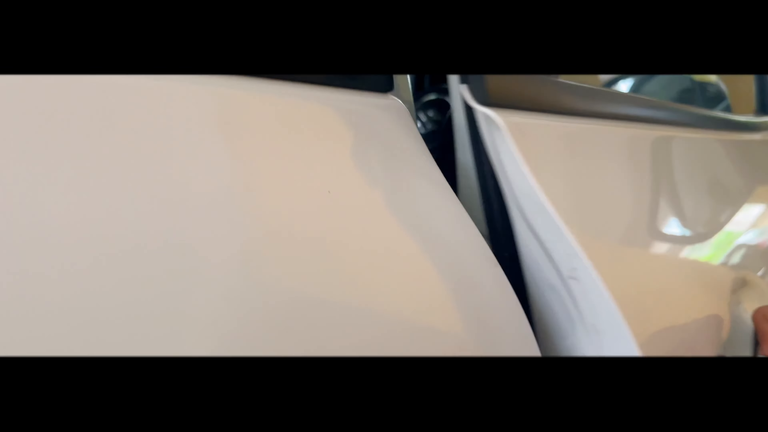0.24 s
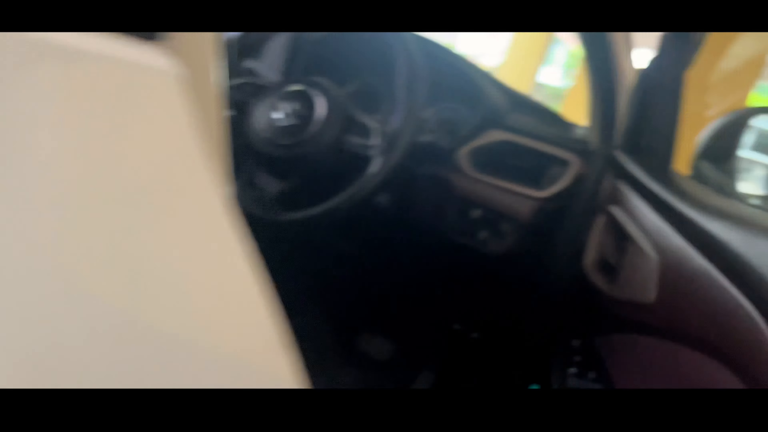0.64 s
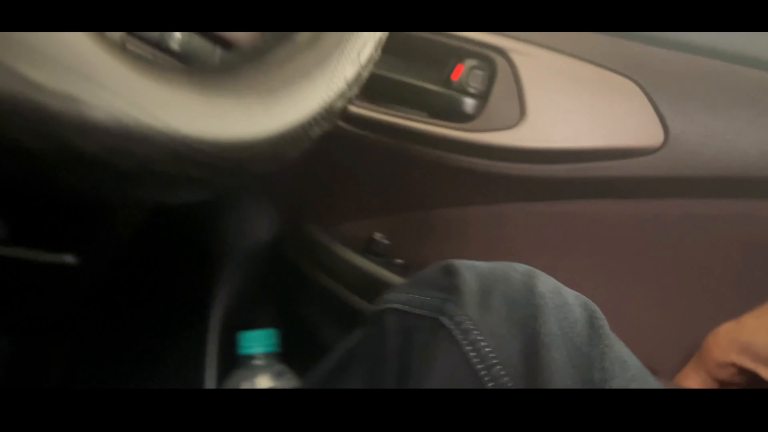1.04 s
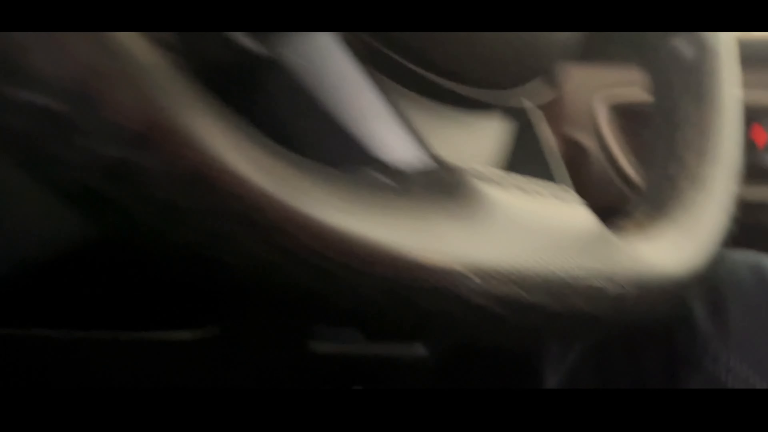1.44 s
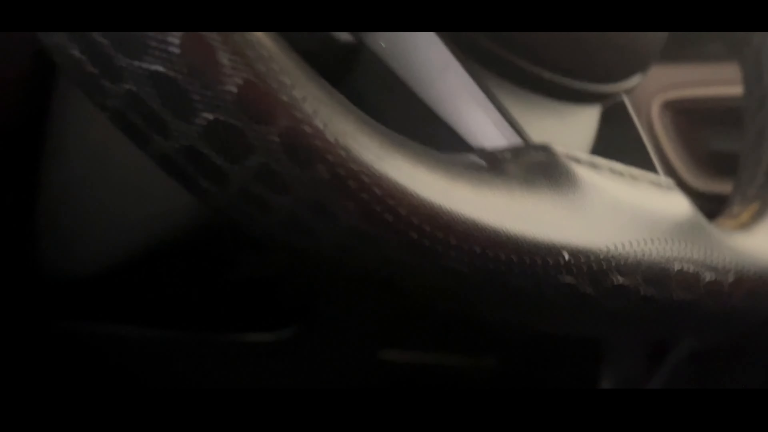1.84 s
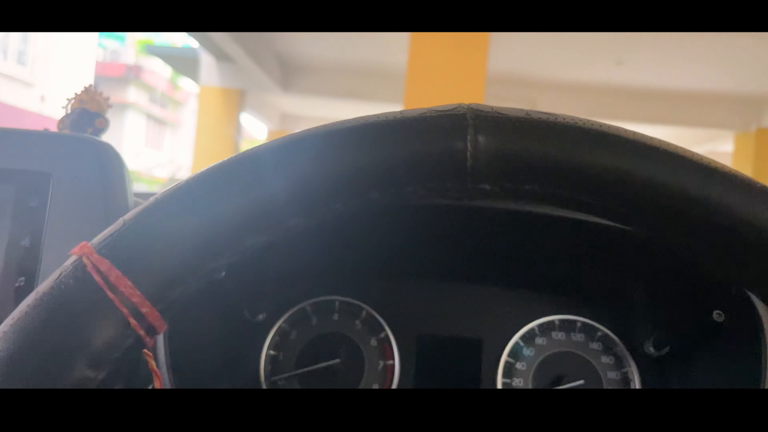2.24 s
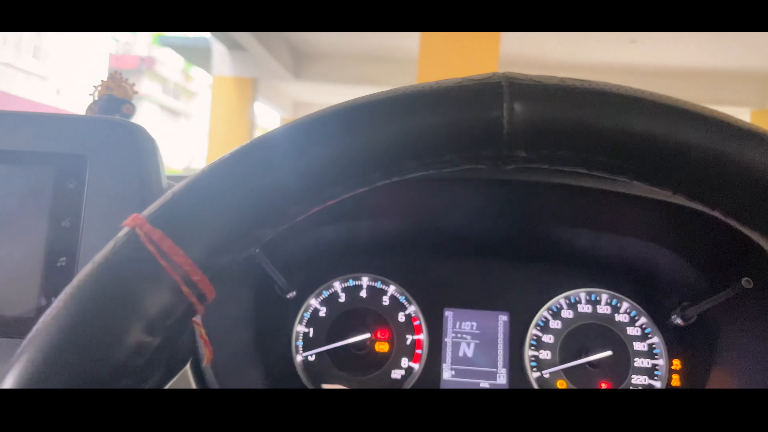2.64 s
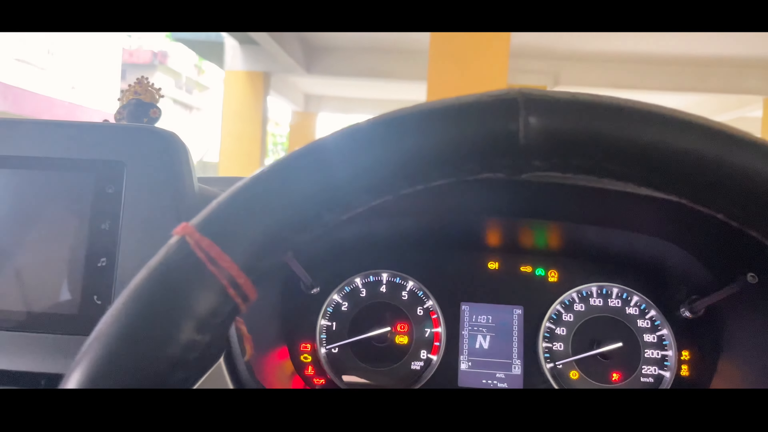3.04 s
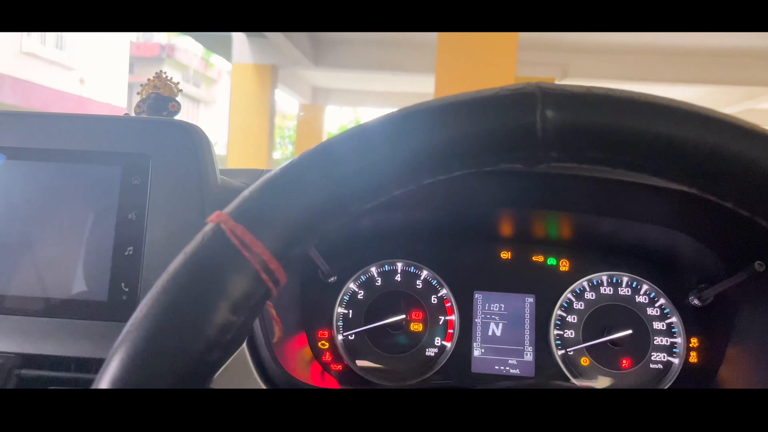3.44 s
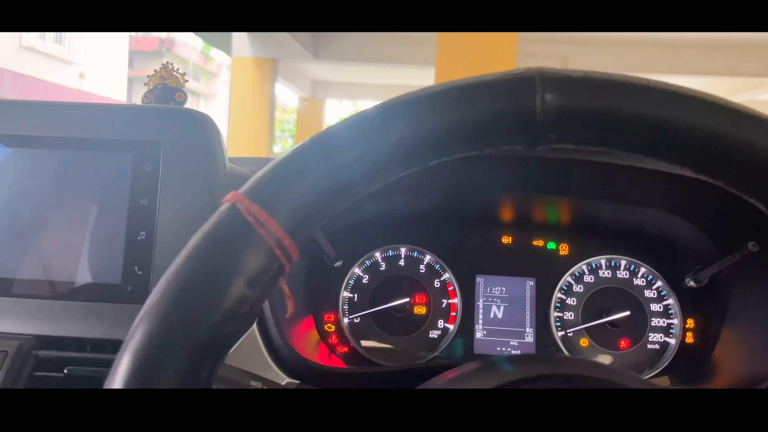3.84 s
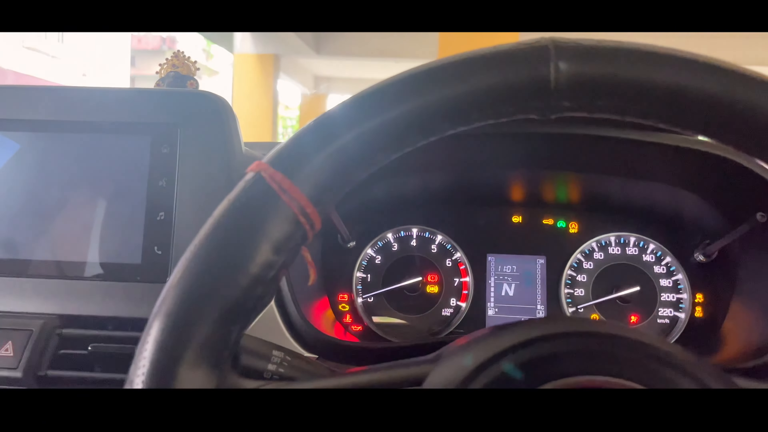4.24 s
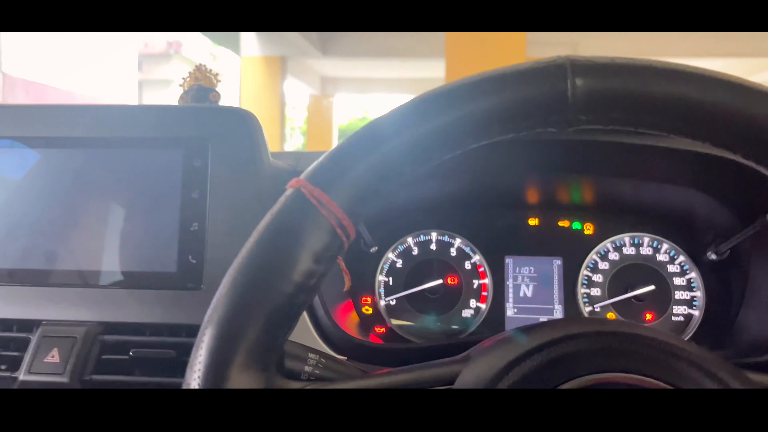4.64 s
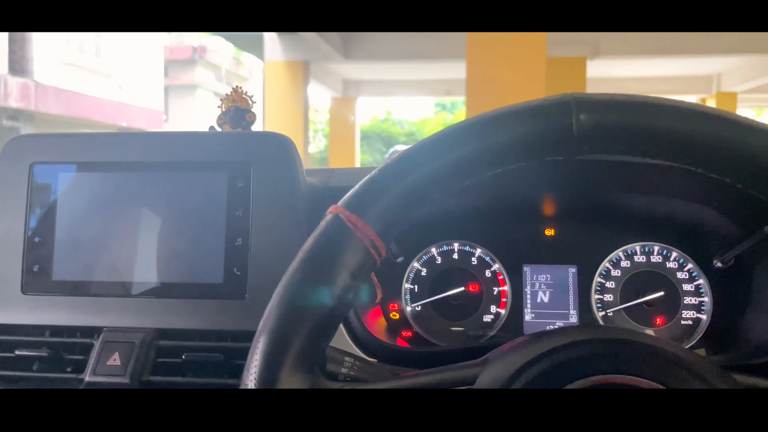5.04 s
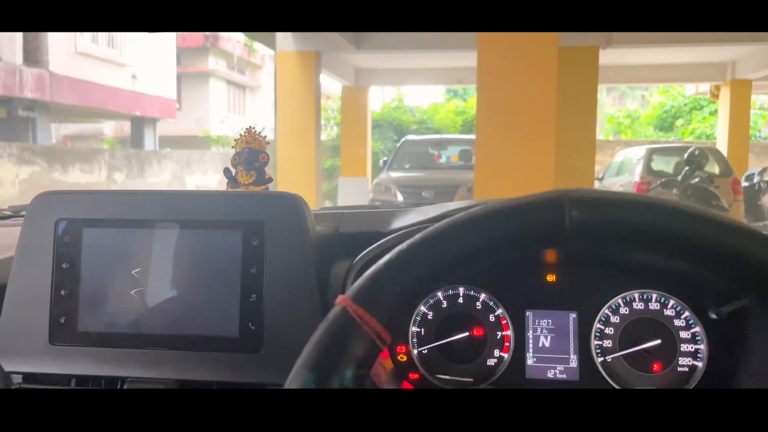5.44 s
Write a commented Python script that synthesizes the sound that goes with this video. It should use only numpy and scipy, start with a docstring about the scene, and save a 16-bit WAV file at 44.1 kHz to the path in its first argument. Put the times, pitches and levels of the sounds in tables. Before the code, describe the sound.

Close stereo microphone moving from a garage into a car: padded door-opening knocks, airy hiss and rumble, a few cabin ticks, an abrupt little noise burst and soft bumps. The door slams with a heavy bass boom, and the space becomes muffled and quiet. A plasticky switch click rings briefly; afterwards only tiny squeaks, trim ticks, clothing rustle, a faint drone and a barely audible distant horn.

```python
"""Car door, from inside the cabin

A door opens, someone climbs in and pulls it shut: noise bursts ring the panel and crack at the latch,
two low tones make the beating boom of cabin air, and a ten-millisecond burst of noise swells and stops dead.
A dashboard switch rattles and rings, trim resonances tick, grainy noise is cloth on the seat, a motor drones.
Behind: a hum, open-air hiss, street rumble, garage murmur and the two tones of a far horn.
Every source is a pair of rows: mid and side, or direct and scattered at the microphone ports."""
import sys
import numpy as np
from scipy import signal
from scipy.fft import rfft, irfft
from scipy.io import wavfile
from scipy.ndimage import uniform_filter1d

SR = 44100
rng = np.random.default_rng(int(sys.argv[2]) if len(sys.argv) > 2 else 0)


def store_pcm(level_fs):
    """Save levels as 16-bit WAV."""
    pcm = np.round(np.clip(level_fs, -1, 1) * 32767).astype(np.int16)
    wavfile.write(sys.argv[1], SR, np.atleast_2d(pcm).T)


def invert_db(level):
    """Linear amplitude ratio for a level in decibels (20 dB per decade), elementwise."""
    return 10 ** (np.asarray(level, dtype=float) / 20)


N = 303779   # length in samples

# Spectra give relative levels: the shaped noise is scaled to rms 1 afterwards.
# Blows on the door: (time [s], body peak [dB], latch crack peak [dB], ring [s], hardness [dB per octave])
DOOR_BLOWS = [(0.082, -13.5, -38, 0.043, 0.5), (0.092, -8.5, -28.5, 0.17, 0), (0.119, -15, -34.5, 0.2, 5),
              (0.976, -23.5, -48, 0.07, -9), (1.025, -26.5, -45.5, 0.12, -3.5),
              (1.554, -18.5, -52, 0.45, 5), (1.589, -4, -12, 0.095, 1), (1.622, -7, -30, 0.18, -2),
              (1.711, -9, -37.5, 0.031, 0.5), (1.764, -18.5, -43.5, 0.041, 1.5),
              (1.855, -39, -58, 0.26, 2.5), (2.632, -38.5, -76, 0.12, -8)]
# Panel resonances: (frequency [Hz], width before damping [Hz], relative level [dB])
PANEL_MODES = [(59.7, 20, 1.5), (93.3, 14, -0.5), (120.7, 19, 0), (164, 38, -0.5), (237.8, 45, -6),
               (326, 50, -5), (401, 62, -7), (510, 100, -14.5), (648.4, 70, -19), (833, 270, -27)]
# Spectrum of the latch crack: (frequency [Hz], relative level per Hz [dB])
LATCH_SPECTRUM = [(350, -35), (800, -0.5), (1900, 5), (3000, -4.5), (6000, -16), (14000, -31),
                  (16000, -53.5)]
GRIT_DB, LATCH_SNAP_S, LATCH_TAIL_DB = 2.5, .022, -7
LATCH_LONGER = 1.5   # the crack outlasts the shake of the panel

# Cabin air squeezed by the door: swells, sags while held, then dies; the pitch climbs as the gap closes
BOOM_TOP_S, BOOM_HOLD_S, BOOM_DB = 1.62, 0.11, -8
BOOM_RISE, BOOM_SAG, BOOM_FALL = 230, 32, 122   # dB per s
BOOM_OPEN_HZ, BOOM_SHUT_HZ, BOOM_CLIMB_S = 44.2, 53.1, .09
BEAT_HZ, BEAT_TOP_S, BEAT_SHARE = 12.5, 1.63, .4

# Spectrum of the noise burst: (frequency [Hz], relative level per Hz [dB])
BURST_SPECTRUM = [(59, -30.5), (100, 4.5), (1400, -5.5), (1760, -13.5), (4960, -20.5), (5750, -35.5),
                  (11300, -32.5), (15500, -51.5)]
BURST_S, BURST_END_S, BURST_DB, BURST_SWELL_DB = .8437, .8541, -7.5, 15

# Spectrum of the switch rattle: (frequency [Hz], relative level per Hz [dB])
SWITCH_SPECTRUM = [(88, -34), (150, -6.5), (668, -9), (844, -2), (1130, -6), (1400, -14), (4140, -12.5),
                   (8170, -21.5), (10900, -14.5), (15000, -29), (16200, -61.5)]
# Small metal parts of the switch: (frequency [Hz], relative level [dB], fall by 60 dB [s])
SWITCH_RINGS = [(134, -4.5, 0.39), (815, -17.5, 0.12), (980, -33, 0.3), (1787, -30, 0.2), (2500, -33, 0.68),
                (2520, -36, 0.83), (4960, -42, 0.2)]
SWITCH_S, SWITCH_RISE_S, SWITCH_DB, SWITCH_FADE_S = 2.412, 0.007, -11, 0.066
SWITCH_GRIT_DB, SWITCH_HIGH_FADE_S = 3.5, .18
RINGS_AFTER_S, RINGS_DB = .037, -35.5

# Clear ticks of the trim: (time [s], peak [dB], hardness [dB per octave], ring [s])
TRIM_TICKS = [(0.0905, -19.5, 2, 0.012), (0.471, -26.5, 6.5, 0.032), (0.542, -34, 1, 0.06),
              (0.563, -24.5, 10.5, 0.013), (2.612, -55, -7, 0.041), (2.708, -56, -8.5, 0.036),
              (2.911, -46, 8.5, 0.027), (3.01, -34, 4, 0.049), (3.049, -52, 10, .02),
              (3.628, -44.5, -1, 0.033), (3.671, -40.5, -15, 0.022), (4.058, -35.5, 1.5, 0.077),
              (4.235, -37, 7, 0.01), (4.285, -46, -0.5, 0.025), (4.501, -45, 1, 0.029),
              (4.552, -37.5, 13.5, 0.0076), (4.63, -40.5, -2, 0.0053), (4.638, -35.5, 5.5, 0.012),
              (4.82, -39.5, -2, 0.016), (4.856, -34.5, -1.5, 0.014), (4.876, -29, 3, 0.0063),
              (5.169, -47, -16, 0.014), (5.409, -39.5, -1.5, 0.021), (5.866, -30.5, -1.5, 0.022),
              (5.919, -43.5, 3, 0.016), (5.981, -44.5, -2.5, 0.016), (6.005, -50, -16, 0.027),
              (6.231, -57.5, 12, .012)]
# Trim resonances: (frequency [Hz], width [Hz], relative level [dB])
TRIM_MODES = [(564, 140, 17.5), (1107, 280, 7), (1484, 330, 11), (1960, 110, -20.5), (2490, 180, -27),
              (3263, 280, -19), (4330, 330, -30.5)]
EDGE_DB = -16   # bright edge of a tick of no hardness
# Thin bright snaps: (time [s], peak [dB], ring [s], lowest frequency [Hz])
BRIGHT_SNAPS = [(.501, -40.5, 0.025, 2500), (2.072, -49, 0.037, 7000), (2.378, -42, 0.18, 1460),
                (3.0063, -36, 0.032, 2500), (3.519, -45, .015, 8500), (3.5548, -42, .012, 5000),
                (3.566, -38.5, 0.027, 5000), (3.676, -41.5, 0.027, 4000), (3.764, -45.5, 0.033, 4000),
                (3.798, -47, .04, 4000), (4.056, -34, 0.081, 8000), (6.425, -56, .008, 600),
                (6.812, -57.5, 0.033, 1990), (6.848, -54, 0.028, 2010)]
# Short squeaks: (time [s], peak [dB], pitch [Hz])
SHORT_SQUEAKS = [(2.179, -57, 3240), (2.908, -46.5, 1680), (2.94, -55, 1690), (2.952, -57, 1690),
                 (2.984, -46.5, 1650), ]
SQUEAK_S, SQUEAK_FADE_S = .018, 0.051
SQUEAK_OVER, SQUEAK_OVER_DB = 1.76, -15.5   # overtone: ratio to the pitch, gain
# Fainter crackles at random in the short rubs: least peak over the rustle level, spread, ring
FIDGET_COUNT, FIDGET_LONGEST_S = 40, .2
FIDGET_DB, FIDGET_SPREAD_DB, FIDGET_RING_S = 13, 3.5, 0.0056

# Cloth rubbing on the seat: (start [s], length [s], rustle level [dB], sheen level [dB])
CLOTH_RUBS = [(0.459, 0.15, -47, -64), (0.96, 0.1, -61, -85), (1.301, 0.17, -61.5, -74),
              (2.906, 0.2, -69.5, -81.5), (3.159, 0.44, -61, -71), (3.372, 0.49, -52.5, -62),
              (3.829, 0.38, -69, -90.5), (4.05, 0.078, -70, -69), (4.305, 0.1, -74, -85.5),
              (4.545, 0.15, -65.5, -81), (4.774, 0.14, -64.5, -82), (5.257, 0.072, -70.5, -101),
              (6.207, 0.22, -80.5, -74.5), (6.441, 0.45, -74.5, -86), (6.785, 0.22, -71, -77)]
# Spectrum of the rustle: (frequency [Hz], relative level per Hz [dB])
CLOTH_SPECTRUM = [(410, -35), (700, -10.5), (1140, -3), (4610, -5.5), (7500, -17), (9750, -60),
                  (16500, -120)]
# Spectrum of its bright sheen: (frequency [Hz], relative level per Hz [dB])
SHEEN_SPECTRUM = [(4410, -29), (7500, -5.5), (12800, 8.5), (14100, -7), (15500, -18.5)]
RUB_TOP_SHARE, RUB_ROUND = 0.41, 0.74   # where a stroke is loudest, how blunt it is
# Spectrum of the steady faint hiss: (frequency [Hz], relative level per Hz [dB])
STILL_SPECTRUM = [(700, -10.5), (1200, -11), (1800, 3), (2600, -12.5), (7000, -19), (14000, -26.5),
                  (16000, -42)]
STILL_DB = -76

PUMP_HZ, PUMP_WIDTH_HZ, PUMP_DB, PUMP_ON_S, PUMP_OFF_S = 253.2, 16, -65.5, 2.92, 6.42
HUM_HZ, HUM_WIDTH_HZ, HUM_ON_S, HUM_OFF_S = 157, 8.0, 0.7, 1.9
HUM_DB, HUM_SAG_DB_PER_S = -42.5, 8

# Spectrum of the open-air hiss: (frequency [Hz], relative level per Hz [dB])
AIR_SPECTRUM = [(410, -29), (700, -1), (2110, -6.5), (4130, -9), (8000, -22), (12100, -14), (14000, -23.5),
                (15500, -53)]
# Whistling bands in the early open air: (frequency [Hz], width [Hz], relative level [dB])
WHISTLE_BANDS = [(3320, 350, 4.5), (4767, 200, 1)]
AIR_DB, AIR_LATER_DB, WHISTLE_DB, WHISTLE_SAG_DB_PER_S = -54, -59.5, -57, 6.5
AIR_FADE_S, AIR_FADE_DB_PER_S, AIR_STOP_S, AIR_STOP_DB_PER_S = 1.53, 11.5, 2.003, 162

# Spectrum of the street rumble: (frequency [Hz], relative level per Hz [dB])
RUMBLE_SPECTRUM = [(15, -30), (25, -9), (59, 1.5), (120, -5), (160, -29.5), (260, -120)]
# Course of the street rumble: (time [s], level [dB])
RUMBLE_COURSE = [(0, -40.5), (.25, -33), (.4, -53), (.7, -55), (.9, -40), (1.1, -40), (1.3, -51),
                 (2.1, -45.5), (2.35, -56.5), (2.65, -49), (3.6, -48), (4.2, -53), (4.7, -49), (5.7, -56),
                 (6.41, -54), (6.6, -48)]
# Spectrum of the garage murmur: (frequency [Hz], relative level per Hz [dB])
GARAGE_SPECTRUM = [(53, -30), (90, -0.5), (269, -8.5), (340, -15), (592, -20), (1500, -35), (1950, -62),
                   (3300, -120)]
# Murmur: sinks to the open-door level, drops as the door seals, rises at 2.92 s, drops suddenly at 6.42 s
MURMUR_START_DB, MURMUR_SINK_DB_PER_S, MURMUR_OPEN_DB = -36, 10, -47
MURMUR_SHUT_DB, MURMUR_RAISED_DB, SEAL_S, SEAL_FADE_S = -61.5, -54.5, 1.826, 0.22
# The body shudders after the slam; rise and fall in dB per s
SHUDDER_S, SHUDDER_DB, SHUDDER_MURMUR_DB, SHUDDER_RISE, SHUDDER_FALL = 1.75, -26.5, -42, 99, 93

# Partials of the far horn: (frequency [Hz], level before its wavering [dB])
HORN_PARTIALS = [(436.0, -69.5), (872.1, -75.5)]
HORN_ON_S, HORN_OFF_S = 5.66, 6.1

# Side against mid inside the cabin: (frequency [Hz], level [dB])
PORT_BALANCE = [(60, -14.5), (200, -8.5), (600, 4), (1300, -0.5), (4000, 0.5), (15000, -4)]
SCATTER_DB = -7   # scattered part against the direct part in the side row
SIDE_LOW_DB, SIDE_TURN_HZ = -15, 450


def thuds():
    """Each blow shakes the panel resonances, the high ones more if it is hard, and cracks at the latch."""
    out = np.zeros((2, N))
    for s, peak_db, crack_db, ring_s, hard_db in DOOR_BLOWS:
        shake = burst(ring_s, rise_s=0.0015, size=16000)
        shake[:, 40:72] += .7 * np.hanning(32)   # the first contact is a single padded knock
        damping = 0.75 / ring_s   # a short blow is held by the seal: broader resonances
        body = 0
        for k, (hz, width, db) in enumerate(PANEL_MODES):
            mode = resonance(resonance(shake, hz, width + damping), hz, 1.7 * hz)
            body = body + invert_db(db + hard_db * np.log2(hz / 250)) * mode * (-1) ** k
        add(out, s, body, peak_db)
        grit = invert_db(GRIT_DB * np.repeat(rng.standard_normal(200), 80))   # the latch parts chatter unevenly
        grit[30:50] *= 4.0   # and meet first with a sharp click
        snap = invert_db(LATCH_TAIL_DB) + np.exp(-np.arange(16000) / SR / LATCH_SNAP_S)
        crack = burst(LATCH_LONGER * ring_s, rise_s=0.0025, size=16000) * grit * snap
        add(out, s, coloured(crack, LATCH_SPECTRUM)[:, :15000], crack_db)
    return out


def boom():
    """The cabin's air mode and a weaker, lower body mode beat against each other."""
    t = np.arange(N) / SR
    climb_s = BOOM_TOP_S - BOOM_CLIMB_S
    hz = np.interp(t, [climb_s, BOOM_TOP_S], [BOOM_OPEN_HZ, BOOM_SHUT_HZ])
    phase = 2 * np.pi * (np.cumsum(hz) / SR - BOOM_OPEN_HZ * climb_s)
    swell = peak_at(BOOM_TOP_S, BOOM_RISE, BOOM_SAG)
    release = peak_at(BOOM_TOP_S + BOOM_HOLD_S, 0, BOOM_FALL - BOOM_SAG)
    height = np.sqrt(2) * invert_db(BOOM_DB) * swell * release
    slip = 2 * np.pi * BEAT_HZ * (t - BEAT_TOP_S)
    mid = height * (np.sin(phase) + BEAT_SHARE * np.sin(phase - slip))
    return np.array([mid, 1.1 * np.roll(mid, 290)])   # the side row comes 290 samples later


def noise_burst():
    """A ten-millisecond burst of shaped noise that swells and stops dead."""
    out = np.zeros((2, N))
    size = round((BURST_END_S - BURST_S) * SR)
    noise = coloured(rng.standard_normal((2, 4096)), BURST_SPECTRUM)[:, :size]
    add(out, BURST_S, noise * invert_db(np.linspace(-BURST_SWELL_DB, 0, size)), BURST_DB)
    return out


def switch():
    """Contacts rattle briefly and leave small metal parts ringing; two close modes beat."""
    out = np.zeros((2, N))
    t = np.arange(40000) / SR
    grit = invert_db(SWITCH_GRIT_DB * np.repeat(rng.standard_normal(2000), 20))
    rattle = coloured(burst(SWITCH_FADE_S, SWITCH_RISE_S, size=40000) * grit, SWITCH_SPECTRUM)
    high = band(rattle, low_hz=2500, high_hz=18040)
    rattle = rattle - high * (1 - invert_db(-60 * t / SWITCH_HIGH_FADE_S))   # the treble dies first
    add(out, SWITCH_S, rattle[:, :20000], SWITCH_DB)
    start = rng.uniform(0, 2 * np.pi, (2, 1))
    rings = sum(invert_db(db - 60 * t / t60) * np.sin(2 * np.pi * hz * t + start) for hz, db, t60 in SWITCH_RINGS)
    rings = rings * flicker(10, 2.2)[:40000] * np.minimum(t / .01, 1)
    add(out, SWITCH_S + RINGS_AFTER_S, rings, RINGS_DB)
    return out


def ticks():
    """Short noise taps excite the trim; lone resonances crackle under the cloth, and snaps are filtered noise."""
    out = np.zeros((2, N))
    for s, peak_db, hard_db, ring_s in TRIM_TICKS:
        tap = burst(ring_s, rise_s=.06 * ring_s, size=4000)   # longer ticks swell more softly
        tap[:, 8] += 2.5   # the first contact is a single sharp click
        add(out, s, trim(tap, hard_db), peak_db)
    short = [rub for rub in CLOTH_RUBS if rub[1] < FIDGET_LONGEST_S]
    for stroke, place, chance, pitch in rng.random((FIDGET_COUNT, 4)):
        s, length, rustle_db, _ = short[int(stroke * len(short))]
        crackle = resonance(burst(FIDGET_RING_S, rise_s=0.0005, size=1500), 1000 * 4 ** pitch, 500)
        place_db = 10 * np.log10(np.sin(np.pi * place) + .01)   # weaker towards the ends of a stroke
        spread_db = -FIDGET_SPREAD_DB * np.log(1 - .95 * chance)
        add(out, s + place * length, crackle, rustle_db + place_db + FIDGET_DB + spread_db)
    for s, peak_db, ring_s, low_hz in BRIGHT_SNAPS:
        snap = burst(ring_s, rise_s=min(.08 * ring_s, .004), size=9000)
        snap = band(band(snap, low_hz, high_hz=11500), low_hz, high_hz=12000)
        add(out, s, snap, peak_db)
    return out + squeaks()


def trim(tap, hard_db):
    """The trim modes ring, the high ones and the bright edge more under a hard contact."""
    body = 0
    for k, (hz, width, db) in enumerate(TRIM_MODES):
        mode = resonance(resonance(tap, hz, width), hz, 5.0 * width)
        body = body + invert_db(db + hard_db * np.log2(hz / 1200)) * mode * (-1) ** k
    body = band(band(body, low_hz=298, high_hz=7045), low_hz=200, high_hz=8950)
    edge = band(tap * np.exp(-np.arange(tap.shape[1]) / 56.0), low_hz=2210, high_hz=10500)
    return body + invert_db(EDGE_DB + 0.73 * hard_db) * edge


def squeaks():
    """A short slip of noise rings one pitch and a weaker overtone."""
    out = np.zeros((2, N))
    for s, peak_db, hz in SHORT_SQUEAKS:
        slip = burst(SQUEAK_FADE_S, rise_s=0.0023, size=round(SQUEAK_S * SR))
        slip = np.pad(slip, ((0, 0), (0, 900)))   # room to ring out
        over_hz = SQUEAK_OVER * hz
        tone = resonance(resonance(slip, hz, 170), hz, 170)
        over = resonance(resonance(slip, over_hz, 300), over_hz, 300)
        add(out, s, tone + invert_db(SQUEAK_OVER_DB) * over, peak_db)
    return out


def rustle():
    """Fibres slip in dense grains over a smooth hiss; short strokes catch more. A faint steady hiss lies below."""
    catching = flicker(60, 2.6)
    _, length, cloth_db, sheen_db = np.transpose(CLOTH_RUBS)
    uneven = strokes() * catching ** np.minimum(0.4 / length[:, None], 1.5)
    grains = invert_db(3 * np.minimum(rng.exponential(1, N), 5)) * (rng.random(N) < 900 / SR)   # 900 per s
    rub = rng.standard_normal((2, N)) * (1 + 2.5 * uniform_filter1d(grains, size=12))
    cloth = invert_db(cloth_db) @ uneven * coloured(rub, CLOTH_SPECTRUM)
    sheen = invert_db(sheen_db) @ uneven * coloured(rub, SHEEN_SPECTRUM)
    still = invert_db(STILL_DB) * coloured(rng.standard_normal((2, N)), STILL_SPECTRUM)
    return cloth + sheen + still


def strokes():
    """Each rub swells and fades by one shape; rows of 0-1."""
    t = np.arange(N) / SR
    rows = []
    for s, length, *_ in CLOTH_RUBS:
        rows.append(np.interp(t, [s, s + RUB_TOP_SHARE * length, s + length], [0, 1, 0]) ** RUB_ROUND)
    return np.array(rows)


def pump():
    """A small motor drones between two times: noise narrowed around one pitch."""
    running = gate(PUMP_ON_S, PUMP_OFF_S, size=3000)
    drone = resonance(rng.standard_normal((2, N)), PUMP_HZ, PUMP_WIDTH_HZ)
    drone = resonance(drone, PUMP_HZ, 2 * PUMP_WIDTH_HZ)
    return invert_db(PUMP_DB) * running * rms_one(drone)


def hum():
    """A sagging hum: a steady sine made to waver by narrow noise at the same pitch."""
    t = np.arange(N) / SR
    height = invert_db(HUM_DB) * peak_at(HUM_ON_S, 0, HUM_SAG_DB_PER_S) * gate(HUM_ON_S, HUM_OFF_S, size=1500)
    waver = rms_one(resonance(rng.standard_normal(N), HUM_HZ, HUM_WIDTH_HZ))
    tone = height * rms_one(np.sin(2 * np.pi * HUM_HZ * t) + 0.46 * waver)
    return np.array([tone, tone])


def open_air():
    """Far hiss, with whistling bands until the noise burst stops, then abruptly lower and plain; fades, then stops."""
    early = np.arange(N) / SR < BURST_END_S
    white = rng.standard_normal((2, N))
    bands = rms_one(sum(invert_db(db) * resonance(white, hz, width) for hz, width, db in WHISTLE_BANDS))
    whistle = early * invert_db(WHISTLE_DB) * peak_at(0, 0, WHISTLE_SAG_DB_PER_S) * bands
    fade = peak_at(AIR_FADE_S, 0, AIR_FADE_DB_PER_S) * peak_at(AIR_STOP_S, 0, AIR_STOP_DB_PER_S)
    return invert_db(np.where(early, AIR_DB, AIR_LATER_DB)) * fade * coloured(white, AIR_SPECTRUM) + whistle


def outside():
    """Lumpy street rumble and the garage murmur, both low noise; both swell as the slammed body shudders."""
    t = np.arange(N) / SR
    rumble_db = np.interp(t, *np.transpose(RUMBLE_COURSE))
    open_db = np.maximum(MURMUR_START_DB - MURMUR_SINK_DB_PER_S * t, MURMUR_OPEN_DB)
    raised = gate(PUMP_ON_S, PUMP_OFF_S, size=1500)
    shut_db = MURMUR_SHUT_DB + (MURMUR_RAISED_DB - MURMUR_SHUT_DB) * raised
    murmur_db = open_db + (shut_db - open_db) * np.clip((t - SEAL_S) / SEAL_FADE_S, 0, 1)
    shudder = peak_at(SHUDDER_S, SHUDDER_RISE, SHUDDER_FALL)
    rumble = coloured(rng.standard_normal((2, N)), RUMBLE_SPECTRUM) * flicker(rate=10.0, depth_db=3.5)
    murmur = coloured(rng.standard_normal((2, N)), GARAGE_SPECTRUM) * flicker(rate=8.0, depth_db=2.2)
    rumble_gain = np.hypot(invert_db(rumble_db), invert_db(SHUDDER_DB) * shudder)
    murmur_gain = np.hypot(invert_db(murmur_db), invert_db(SHUDDER_MURMUR_DB) * shudder)
    return rumble_gain * rumble + murmur_gain * murmur


def horn():
    """Two partials of a far horn, steady in pitch and wavering in level."""
    t = np.arange(N) / SR
    blown = gate(HORN_ON_S, HORN_OFF_S, size=2500) * flicker(rate=14.0, depth_db=5.0)
    tone = blown * sum(np.sqrt(2) * invert_db(db) * np.sin(2 * np.pi * hz * t) for hz, db in HORN_PARTIALS)
    return np.array([tone, tone])


def ports(source):
    """Cabin sound reaches the microphone ports a quarter cycle apart in the side row; a part is scattered."""
    direct, scattered = source
    side = invert_db(SCATTER_DB) * rfft(scattered) - 1j * rfft(direct)
    return np.array([direct, irfft(side * spectrum_gain(PORT_BALANCE, N), N)])


def rms_one(x):
    """Scales x to rms 1."""
    return x / np.sqrt(np.mean(x ** 2) + 1e-20)


def spectrum_gain(spectrum, size):
    """Gain at each FFT bin, read from (frequency [Hz], level [dB]) on a log frequency scale."""
    hz, db = np.transpose(spectrum)
    grid = np.maximum(np.arange(size // 2 + 1) * SR / size, 1)
    return invert_db(np.interp(np.log(grid), np.log(hz), db))


def coloured(x, spectrum):
    """Shapes the rows of x by a spectrum; rms 1."""
    size = x.shape[-1]
    return rms_one(irfft(rfft(x) * spectrum_gain(spectrum, size), size))


def flicker(rate, depth_db):
    """A gain that wanders at random about rate times a second, by depth_db rms at its steps."""
    steps = rng.standard_normal(int(N / SR * 60) + 2)   # 60 steps per s
    smooth = rms_one(uniform_filter1d(steps, max(1, round(30 / rate))))
    return invert_db(depth_db * np.interp(np.arange(N) / SR * 60, np.arange(len(steps)), smooth))


def resonance(x, hz, width_hz):
    """Two-pole resonance with gain about 1 on top."""
    r = np.exp(-np.pi * width_hz / SR)
    poles = [1, -2 * r * np.cos(2 * np.pi * hz / SR), r * r]
    return signal.lfilter((1 - r * r) / 2 * np.array([1, 0, -1]), poles, x)


def band(x, low_hz, high_hz):
    """Band-pass filter."""
    sos = signal.butter(2, [low_hz, min(high_hz, .45 * SR)], "band", fs=SR, output="sos")
    return signal.sosfilt(sos, x)


def burst(fade_s, rise_s, size):
    """Two rows of noise that swell quickly and die 60 dB in fade_s."""
    t = np.arange(size) / SR
    return rng.standard_normal((2, size)) * np.minimum(t / rise_s, 1) * invert_db(-60 * t / max(fade_s, .002))


def gate(on_s, off_s, size):
    """One between two times, with soft edges of size samples."""
    t = np.arange(N) / SR
    return uniform_filter1d(1. * (t > on_s) * (t < off_s), size=size)


def peak_at(top_s, rise, fall):
    """A gain that climbs to 1 at top_s and sinks again, in dB per s; rise 0 holds it at 1 before."""
    t = np.arange(N) / SR - top_s
    return invert_db(np.minimum(rise * t, -fall * t))


def add(out, s, sound, peak_db):
    """Lays a sound into out at s with the given peak in the first row."""
    i = max(round(s * SR), 0)
    sound = sound[:, :N - i]
    out[:, i:i + sound.shape[1]] += sound * invert_db(peak_db) / np.abs(sound[0]).max()


def scene():
    """Mixes the sources to left and right; the first group is weaker in the side row in the bass."""
    mid, side = boom() + rustle() + hum() + open_air() + horn()
    high = signal.sosfilt(signal.butter(1, SIDE_TURN_HZ, "high", fs=SR, output="sos"), side)
    side = high + invert_db(SIDE_LOW_DB) * (side - high)
    in_cabin = ports(thuds() + noise_burst() + switch() + ticks() + pump() + outside())
    mid, side = np.array([mid, side]) + in_cabin
    return np.array([mid + side, mid - side])


def roll_off(x):
    """The treble ends steeply here."""
    return signal.sosfilt(signal.butter(12, 16160, fs=SR, output="sos"), x)


def record(dry):
    """Peaks are rounded softly."""
    mix = 1.36 * np.tanh(dry / 1.417)
    return roll_off(mix)


dry = scene()
out = record(dry)
store_pcm(out)
```